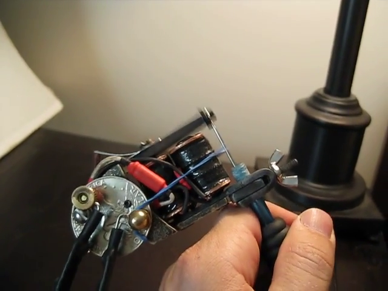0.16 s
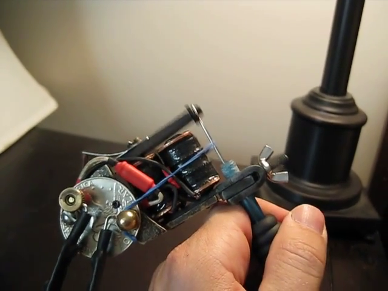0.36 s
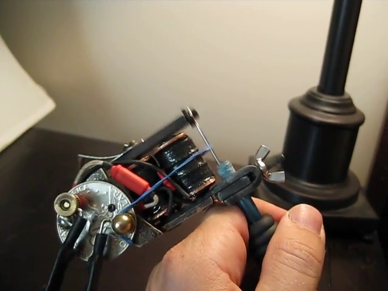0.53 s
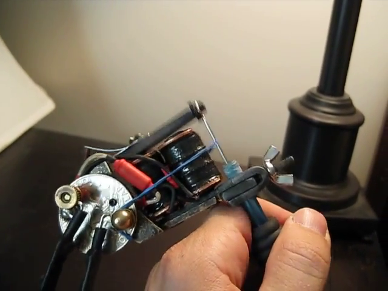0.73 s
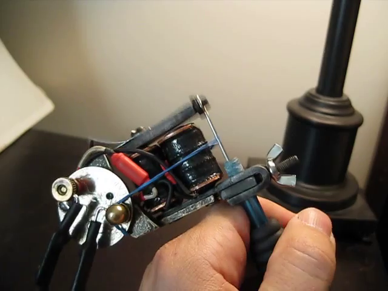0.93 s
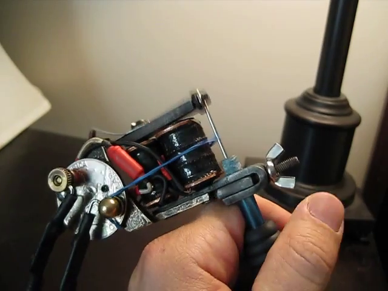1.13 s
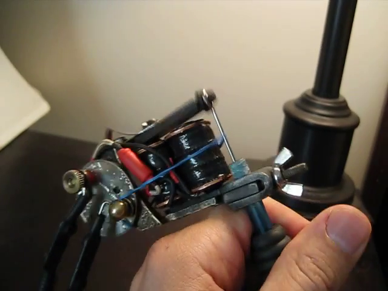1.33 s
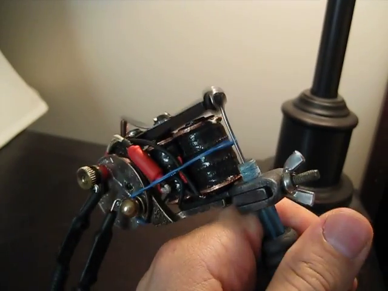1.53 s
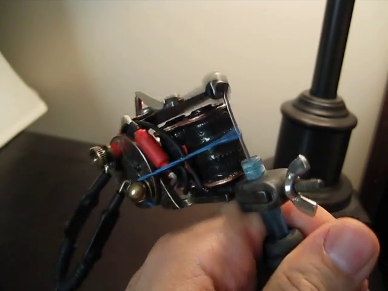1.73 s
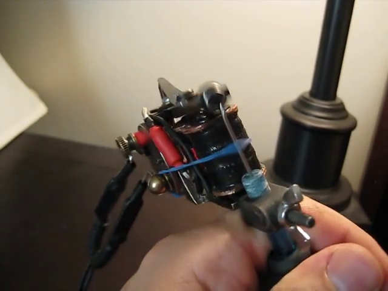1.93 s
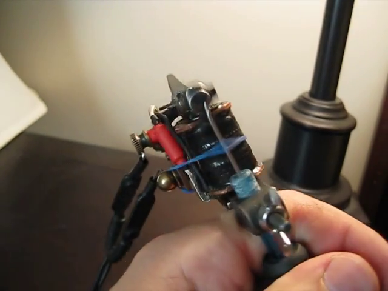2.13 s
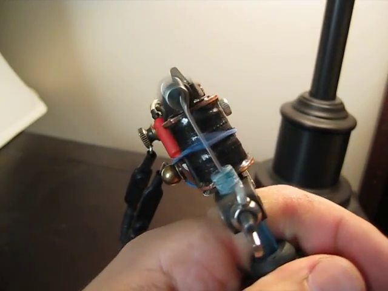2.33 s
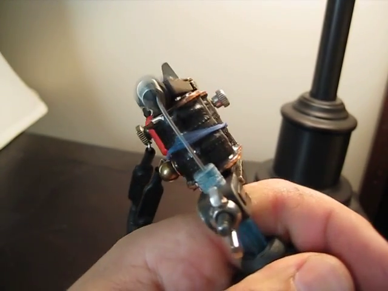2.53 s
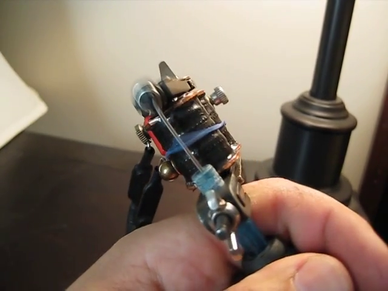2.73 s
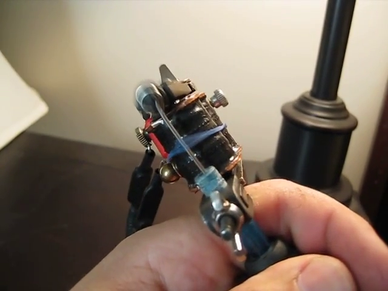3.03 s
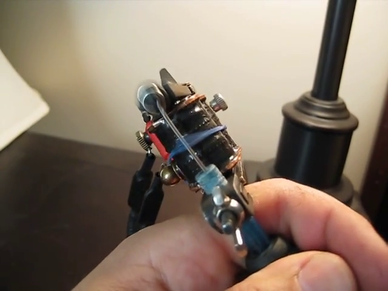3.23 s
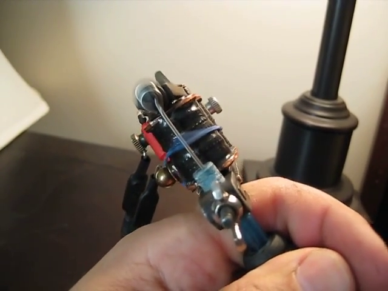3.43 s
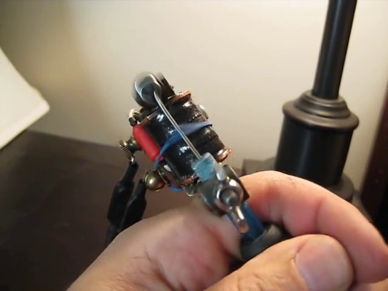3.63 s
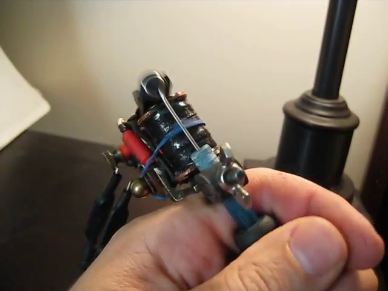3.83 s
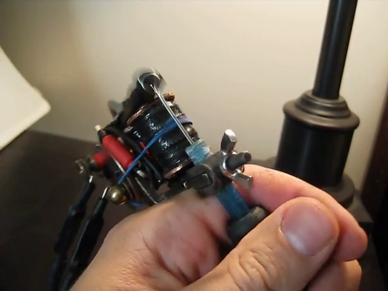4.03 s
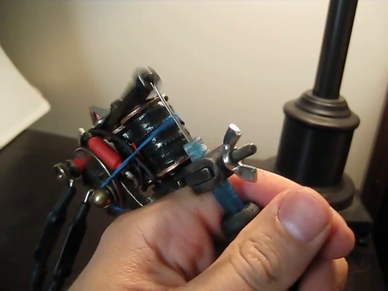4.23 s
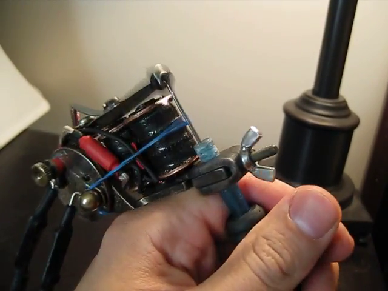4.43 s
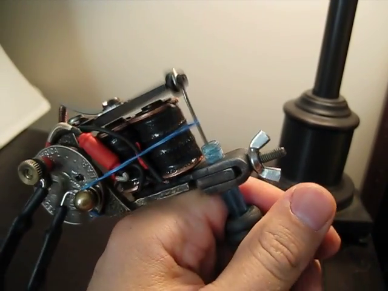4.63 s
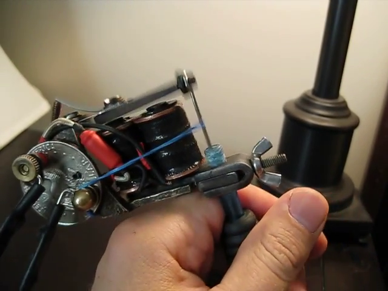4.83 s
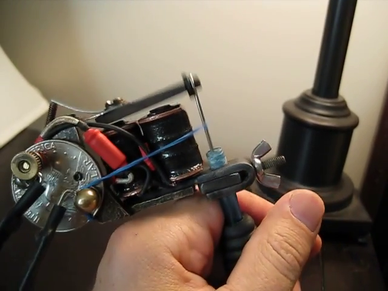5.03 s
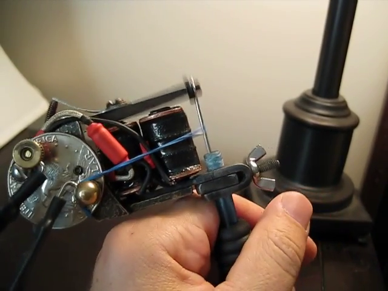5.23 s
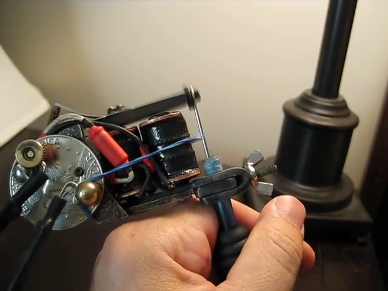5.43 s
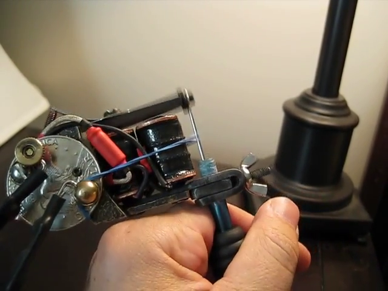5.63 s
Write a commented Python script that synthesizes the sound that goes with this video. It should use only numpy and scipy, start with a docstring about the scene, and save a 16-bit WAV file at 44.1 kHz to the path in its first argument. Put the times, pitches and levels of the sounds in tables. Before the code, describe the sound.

Steady, crisp electromagnetic buzzing from a handheld coil machine, its treble tone shifting as it turns, stopping suddenly at the very end.

```python
"""In a small room, a coil tattoo machine buzzes in a hand close by, is turned to face the listener and back,
then switched off. About 61 to 62 times a second the armature bar snaps onto the coil core: impulses with
rebounds ring steel resonances into a bright click, over a dull low pulse with each click, of uneven strength.
Turning changes which resonances face the listener; the needle rattles briefly at three moments.
The spring lets go with a faint ping and thud; a desk echo, noise reverberation and room tone surround it."""
import sys
import numpy as np
from scipy import signal
from scipy.fft import rfft, irfft
from scipy.io import wavfile
from scipy.ndimage import uniform_filter1d

SR = 44100
rng = np.random.default_rng(int(sys.argv[2]) if len(sys.argv) > 2 else 0)


def inscribe(sig):
    """Save sig as 16-bit PCM at rate SR to the path in sys.argv[1].

    A 1-D sig is mono; a 2-D sig holds one channel per row.
    Samples are clipped to [-1, 1] before scaling.
    """
    pcm = np.round(np.clip(np.atleast_2d(sig).T, -1, 1) * 32767)
    wavfile.write(sys.argv[1], SR, pcm.astype(np.int16))


N = 311649
TIME = np.arange(N) / SR
SWITCH_OFF_S, ROOM_T60_S = 6.974, 0.34

# Armature speed. Each row: time in seconds, strokes per second.
STROKE_RATE = [(0.0, 61.67), (0.5, 62.2), (0.9, 61.93), (1.4, 61.94), (1.95, 61.47), (2.5, 62.01),
               (3.0, 61.77), (3.5, 61.85), (4.0, 61.55), (4.5, 61.16), (5.0, 61.22), (5.5, 61.19),
               (6.0, 60.92), (6.5, 60.83), (7.0, 60.82)]
# Strength of the click. Each row: time in seconds, relative level in dB.
CLICK_LEVEL = [(0.03, -29.5), (0.1, -27.5), (0.6, -29.5), (1.67, -25), (4.03, -26.5), (4.12, -25),
               (5.23, -27), (5.33, -28.5), (5.75, -27), (6.9, -25.5)]
# How the machine is held. Each row: time in seconds, facing (0 side on, 1 slanted, 2 three-quarter,
# 3 end on; values above 3 count as end on in the steel), lag of the echo off the hand in ms.
HAND_POSE = [(0, 1.44, 0.44), (1.0, 0.3, 0.45), (1.4, 1.64, 0.54), (1.75, 3.1, 0.55), (2.1, 3.86, .70),
             (2.6, 3.72, 0.65), (3.55, 3.7, 0.69), (3.9, 2.74, 0.64), (4.15, 2.58, .52), (4.5, 2.56, 0.517),
             (4.85, 0.89, 0.486), (5.3, 1.03, 0.48), (5.9, 0.22, 0.53), (7.0, 0.34, 0.53)]
# Resonances of steel frame, bar and springs. Each row: centre in Hz, width in Hz, then relative levels
# in dB radiated side on, slanted, three-quarter and end on.
STEEL_MODES = [(2585, 208, 12.5, 7.5, 12, 2), (2804, 475, 5, 5.5, 9.5, 2.5), (3583, 244, 2.5, -5.5, 4, -3),
               (4003, 67, -1, 6.5, -2, 5.5), (4850, 1130, -1, -3, -3.5, -6.5), (5496, 295, 4, 6.5, -27, -3),
               (6414, 860, 3, 0, -21, 6), (7130, 1270, 1.5, 2.5, 7.5, 9.5), (9340, 740, 7, -2.5, 4.5, 0),
               (9887, 55, 16, 15, 16, 14.5), (10880, 680, 14, 11, 12.5, 11), (11295, 363, 17, 19, 21.5, 20),
               (12450, 890, 18, 17, 22.5, 16.5), (12740, 460, 9, 20, 16.5, 20),
               (14660, 950, 12, 11, 3, 9.5), (15040, 690, 15, 11, 16.5, -8), (16430, 430, 1, 15.5, 17.5, 6),
               (16700, 1300, -10, 5, 18, -15)]


def from_db(db):
    """Decibels to amplitude gain."""
    return 10 ** (np.asarray(db) / 20)


def curve(rows, t):
    """Columns of a table interpolated at the times t."""
    s, *columns = np.transpose(rows)
    return [np.interp(t, s, column) for column in columns]


def unit_energy(x):
    """Scale a response to energy 1."""
    return x / np.sqrt(np.sum(x ** 2))


def coloured_noise(spectrum, size):
    """Noise of rms 1, its spectrum interpolated in dB over log frequency."""
    hz, db = np.transpose(spectrum)
    grid_hz = np.maximum(np.fft.rfftfreq(size, 1 / SR), 1)
    gain = from_db(np.interp(np.log(grid_hz), np.log(hz), db))
    x = irfft(rfft(rng.standard_normal(size)) * gain, size)
    return x / x.std()


def clicks(times, sizes):
    """Impulses placed between the samples by a windowed sinc."""
    at = times[:, None] * SR
    taps = np.floor(at).astype(int) + np.arange(-11, 13)
    window = np.cos(np.pi * (taps - at) / 24) ** 2
    shape = np.sinc(taps - at) * window
    return np.bincount(np.clip(taps, 0, N - 1).ravel(), (sizes[:, None] * shape).ravel(), N)


def resonate(x, hz, width_hz):
    """One two-pole resonance, gain about 1 at its top."""
    r = np.exp(-np.pi * width_hz / SR)
    b = (1 - r * r) / 2 * np.array([1, 0, -1])
    a = [1, -2 * r * np.cos(2 * np.pi * hz / SR), r * r]
    keep_alive = 1e-18 * (-1) ** np.arange(len(x))  # avoids slow denormal numbers
    return signal.lfilter(b, a, x + keep_alive)


def evened(x):
    """Hold the rms near 1 over about 0.2 s; the gain freezes at switch-off."""
    power = x[TIME < SWITCH_OFF_S] ** 2
    for _ in range(2):
        power = uniform_filter1d(power, size=5000)
    return x / np.sqrt(np.pad(power, (0, N - len(power)), "edge") + 1e-12)


def stroke_times(first_stroke_s=.0081, jitter_ms=0.042):
    """The contact breaks once a cycle, never at quite the same instant."""
    cycles = np.cumsum(curve(STROKE_RATE, TIME)[0]) / SR
    cycles -= np.interp(first_stroke_s, TIME, cycles)
    last_cycle = int(np.interp(SWITCH_OFF_S, TIME, cycles))
    times = np.interp(np.arange(last_cycle + 1), cycles, TIME)
    return times + jitter_ms * rng.standard_normal(len(times)) / 1000


def armature(times, hit_uneven_db=.5, rebound_uneven=.15, rebound_wander=0.029, hand_echo=0.22):
    """Force of each hit and its rebounds, the later ones less punctual, with their echo off the hand."""
    # Contacts as bar and needle settle. Each row: delay after the hit in ms, level below the hit in dB.
    rebounds = [(0.196, -5.5), (0.853, -11), (1.301, -16.5), (2.7, -16), (3.3, -17)]
    sizes = from_db(hit_uneven_db * rng.standard_normal(len(times)))
    lag_s = curve(HAND_POSE, times)[1] / 1000
    force = clicks(times, sizes) + clicks(times + lag_s, hand_echo * sizes)
    for delay_ms, db in rebounds:
        late, strong = rng.standard_normal((2, len(times)))
        at_s = times + delay_ms * (1 + rebound_wander * late) / 1000
        size = sizes * from_db(db) * (1 + rebound_uneven * strong)
        force += clicks(at_s, size) + clicks(at_s + lag_s, hand_echo * size)
    return force


def steel(force):
    """Steel resonances ring, each as loud as it faces the listener, over the frame's faint long rings."""
    # Rings of frame and grip. Each row: centre in Hz, width in Hz, relative level in dB.
    frame_modes = [(490.5, 4, -14), (610, 39, -18.5), (973, 130, -21), (1328, 70, -10.5), (1610, 93, -17.5),
                   (2020, 94, -2.5), (2500, 58, -27.5), (3160, 96, -1)]
    facing = curve(HAND_POSE, TIME)[0]
    out = np.zeros(N)
    for k, (hz, width_hz, *facing_db) in enumerate(STEEL_MODES):
        gain = np.interp(facing, np.arange(len(facing_db)), from_db(facing_db))
        out += (-1) ** k * resonate(force, hz, width_hz) * gain  # neighbours in opposite sign
    for hz, width_hz, db in frame_modes:
        out += from_db(db) * resonate(force, hz, width_hz)
    return evened(out)


def low_pulse(times, level_db=3, flip=0.25, steady_above_db=-48, steadying_per_db=.15, lag_ms=.25):
    """A dull low pulse with each click: its sign varies in short runs when weak, holds when strong."""
    # Each row: time in seconds, strength in dB before level_db.
    pulse_level = [(0.0, -52), (0.69, -47), (0.79, -52.5), (1.55, -45), (1.72, -57), (1.78, -44),
                   (1.97, -43.5), (2.11, -58), (2.54, -51.5), (2.55, -46.5), (2.75, -64.5), (3.29, -49),
                   (3.33, -66), (3.42, -50.5), (3.89, -56), (4.12, -48), (4.45, -51), (4.49, -41),
                   (4.63, -59.5), (5.09, -47.5), (6.19, -54.5), (6.95, -49)]
    # Brief changes in the level of the low pulse. Each row: middle in seconds, change in dB.
    level_bumps = [(2.57, 5), (3.455, 5.5), (4.49, -1.5), (6.85, 3)]
    # Unevenness from stroke to stroke. Each row: time in seconds, standard deviation in dB.
    spread = [(0, 5.5), (3.5, 4.5), (7, 3)]
    bump_s = 0.019
    run, chance, strong = rng.standard_normal((3, len(times)))
    strength_db = curve(pulse_level, TIME)[0]
    for middle_s, db in level_bumps:
        strength_db = strength_db + db * np.exp(-((TIME - middle_s) / bump_s) ** 2)
    excess_db = np.maximum(np.interp(times, TIME, strength_db) - steady_above_db, 0)
    sign = np.sign(uniform_filter1d(run, size=9) + flip * chance + steadying_per_db * excess_db)
    train = clicks(times + lag_ms / 1000, sign * from_db(curve(spread, times)[0] * strong))
    band = signal.butter(2, [45, 3200], "band", fs=SR, output="sos")
    return evened(signal.sosfilt(band, train)) * from_db(strength_db + level_db)


def rattle(times, lag_ms=0.606, loose_ms=0.054, uneven_db=2):
    """The needle taps its tube just after each stroke, loosely timed, audible while the machine is tipped."""
    # Each row: middle in seconds, half length in seconds, peak level in dB.
    rattles = [(1.45, 0.24, -43), (1.86, 0.12, -41.5), (4.15, .11, -40)]
    # Needle and tube resonances. Each row: centre in Hz, width in Hz, relative level in dB.
    tube_modes = [(2150, 330, -1.5), (3330, 480, 0), (4880, 99, 1.5)]
    late, strong = rng.standard_normal((2, len(times)))
    taps = clicks(times + (lag_ms + loose_ms * late) / 1000, from_db(uneven_db * strong))
    ringing, swell = np.zeros(N), np.zeros(N)
    for k, (hz, width_hz, db) in enumerate(tube_modes):
        ringing += (-1) ** k * from_db(db) * resonate(taps, hz, width_hz)
    for middle_s, half_s, db in rattles:
        swell += from_db(db) * np.exp(-((TIME - middle_s) / half_s) ** 2)
    return evened(ringing) * swell


def release(at_s=6.982, thud_db=-48):
    """The spring swings back against the contact screw: a ping over a soft thud dying away in the room."""
    # Ringing parts. Each row: centre in Hz, width in Hz, gain in dB.
    ping_modes = [(130, 10, -3), (374, 20, 3), (870, 50, 1), (3220, 56, 11)]
    # Colour of the thud. Each row: frequency in Hz, relative level in dB per Hz.
    thud_colour = [(60, -4), (400, -0.5), (1000, -2), (3000, -6), (6000, -22)]
    tap = clicks(np.array([at_s]), np.ones(1))
    ping = sum(from_db(db) * resonate(tap, hz, width_hz) for hz, width_hz, db in ping_modes)
    decay_db = -60 * np.maximum(TIME - at_s, 0) / ROOM_T60_S
    fade = (TIME > at_s) * from_db(thud_db + decay_db)
    return ping + fade * coloured_noise(thud_colour, N)


def desk_echo(direct, delay_ms=6.4, level_db=-16):
    """One delayed, weaker copy of the clicks off the desk."""
    return from_db(level_db) * np.pad(direct, (int(delay_ms * SR / 1000), 0))[:N]


def room(times, level_db=-5, near_db=5, near_t60_s=0.034, build_s=0.00075):
    """Fast near decay plus slow wall decay; each way of facing sends the clicks along other paths."""
    # Colour of the room's answer. Each row: frequency in Hz, relative level in dB per Hz.
    room_colour = [(100, -28.5), (500, -26.5), (1800, -20), (2600, -12.5), (4000, -8), (5500, -13.5),
                   (7000, -10), (8400, -17.5), (9400, -4), (10400, 2.5), (11300, 3.5), (13000, 0),
                   (14400, 2.5), (15600, -12), (16600, -3)]
    facing, t = curve(HAND_POSE, times)[0], TIME[:SR // 2]
    # Root of samples per stroke: the train's rms follows CLICK_LEVEL at any rate.
    sizes = from_db(curve(CLICK_LEVEL, times)[0]) * np.sqrt(SR / curve(STROKE_RATE, times)[0])
    walls = from_db(-60 * t / ROOM_T60_S)
    near = from_db(near_db - 60 * t / near_t60_s)
    fade = (walls + near) * (1 - np.exp(-(t / build_s) ** 2))
    out = np.zeros(N)
    for way in range(len(STEEL_MODES[0]) - 2):
        share = np.sqrt(np.clip(1 - np.abs(facing - way), 0, 1))
        response = unit_energy(coloured_noise(room_colour, len(t)) * fade)
        out += signal.fftconvolve(clicks(times, sizes * share), response)[:N]
    return from_db(level_db) * out


def room_tone(level_db=-50):
    """Steady coloured noise."""
    # Each row: frequency in Hz, relative level in dB per Hz.
    hush_colour = [(20, -3.5), (80, -13), (200, -19.5), (600, -20.5), (2000, -14.5), (16000, -11)]
    return from_db(level_db) * coloured_noise(hush_colour, N)


def scene(click_db=1.5):
    """The machine, its echo off the desk, the room and the room tone."""
    times = stroke_times()
    direct = steel(armature(times)) * from_db(curve(CLICK_LEVEL, TIME)[0] + click_db)
    machine = direct + low_pulse(times) + rattle(times) + release()
    return (machine + desk_echo(direct) + room(times) + room_tone())[None]


def record(dry, dip_hz=7950, dip_width_hz=1180, cutoff_hz=17300):
    """The microphone port cancels one treble band; a steep low-pass cuts the top."""
    b, a = signal.iirnotch(dip_hz, dip_hz / dip_width_hz, fs=SR)
    dipped = signal.lfilter(b, a, dry)
    low_pass = signal.ellip(10, .2, 70, cutoff_hz, fs=SR, output="sos")
    return signal.sosfilt(low_pass, dipped)


dry = scene()
out = record(dry)
inscribe(out)
```